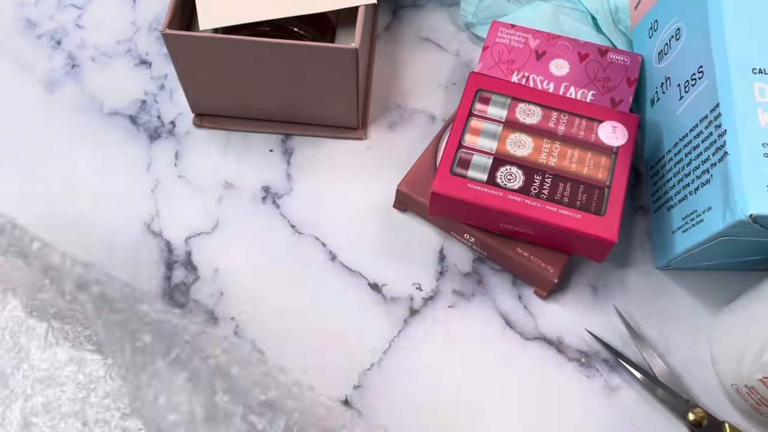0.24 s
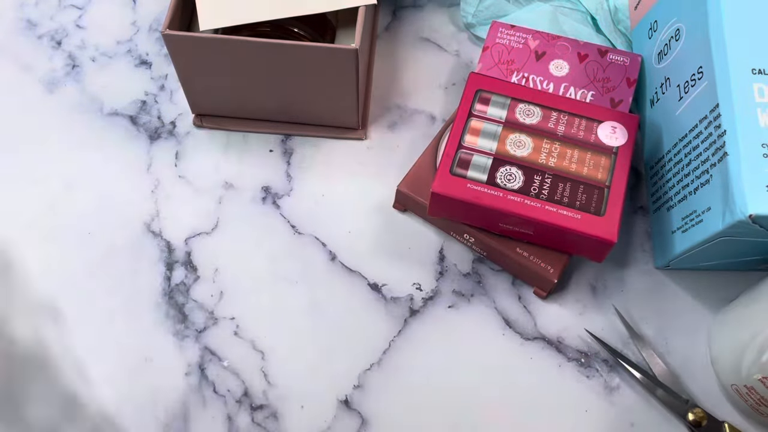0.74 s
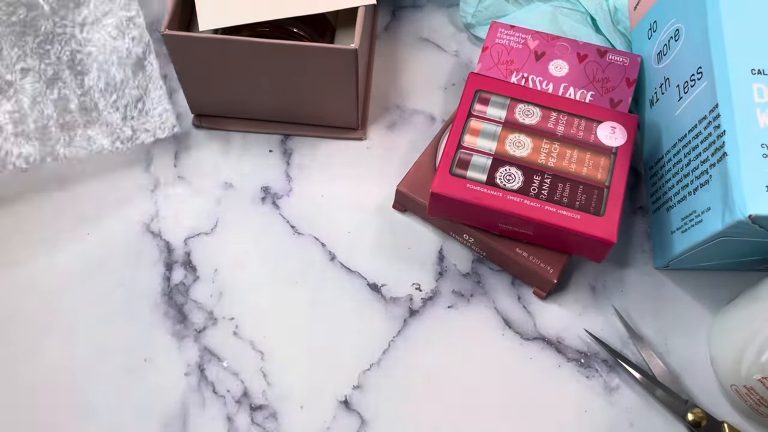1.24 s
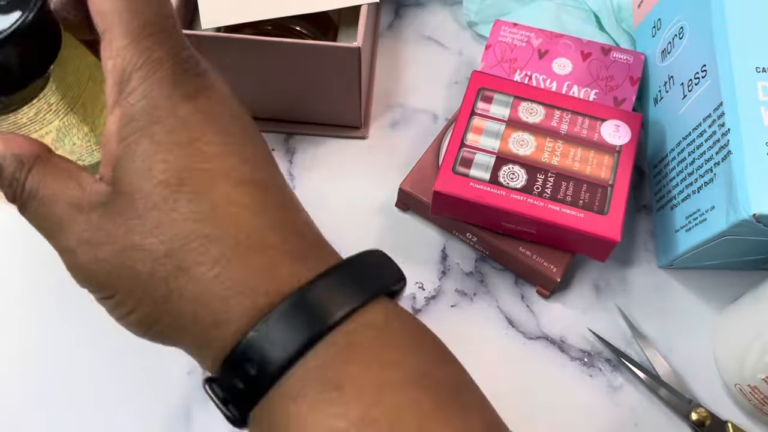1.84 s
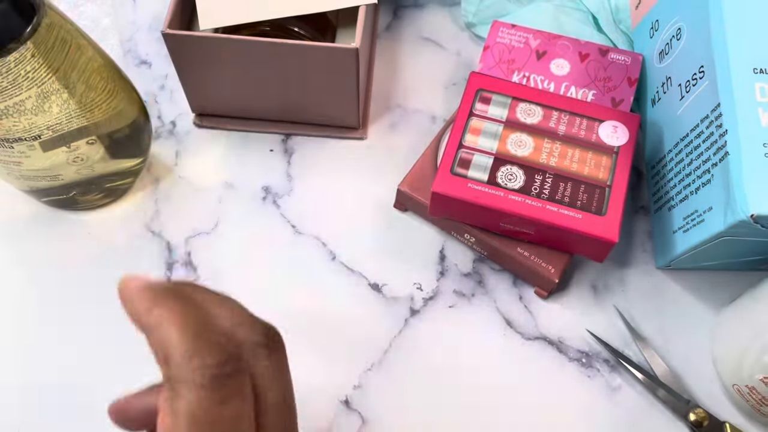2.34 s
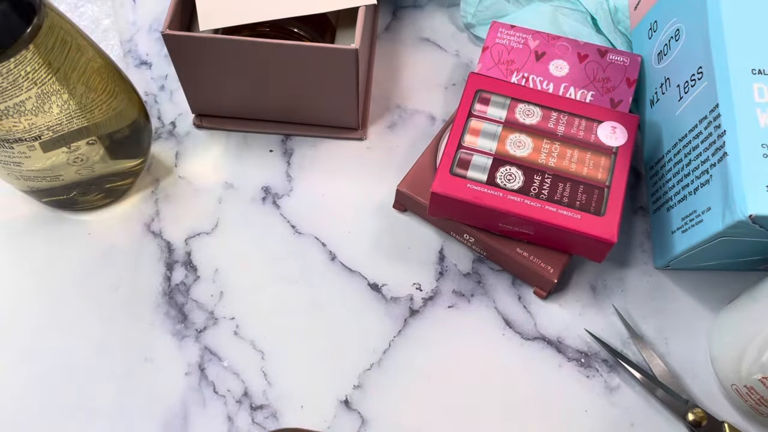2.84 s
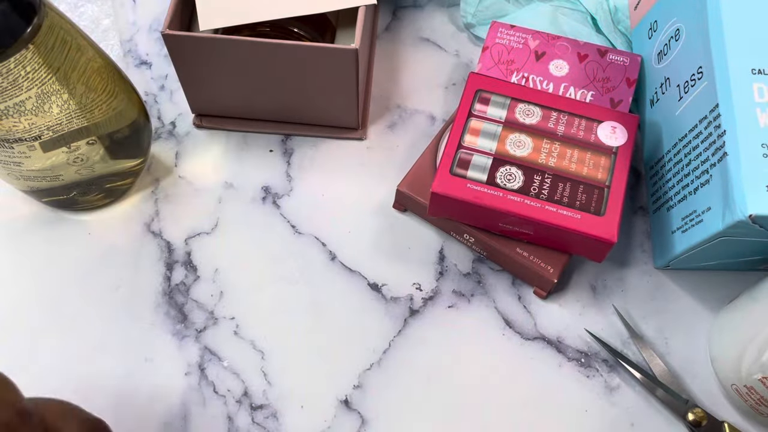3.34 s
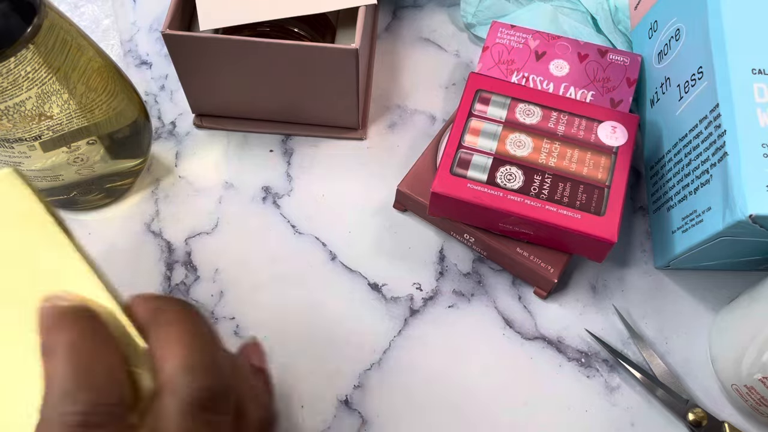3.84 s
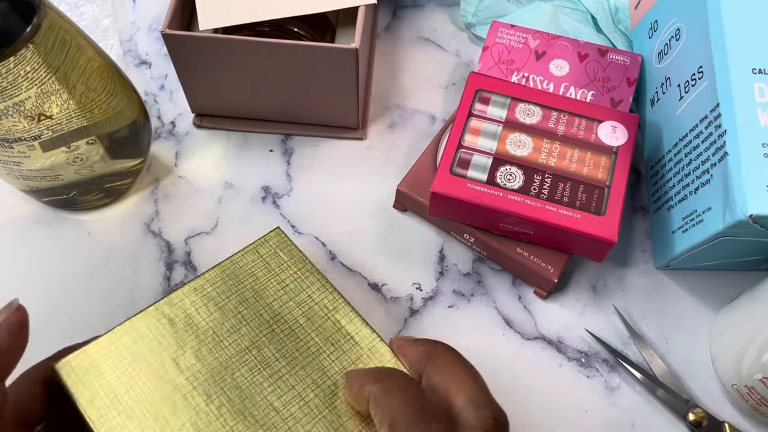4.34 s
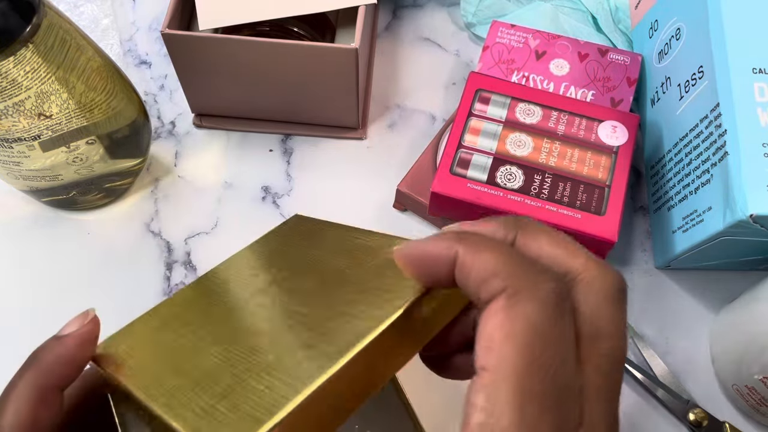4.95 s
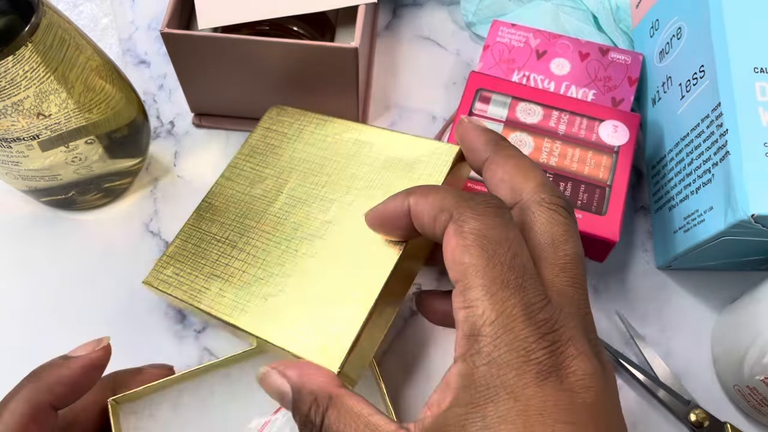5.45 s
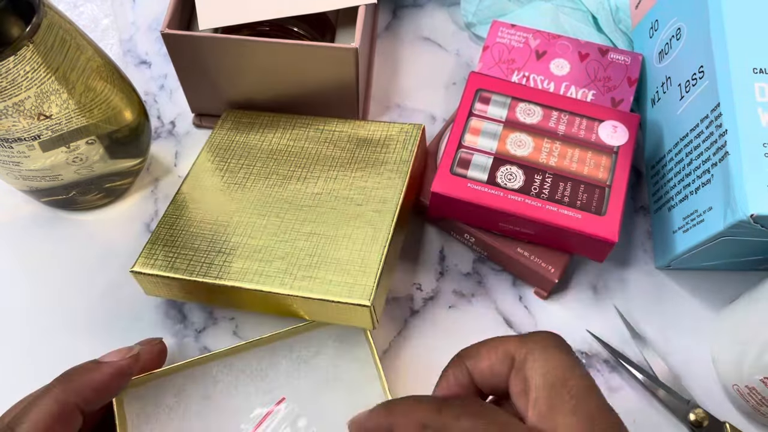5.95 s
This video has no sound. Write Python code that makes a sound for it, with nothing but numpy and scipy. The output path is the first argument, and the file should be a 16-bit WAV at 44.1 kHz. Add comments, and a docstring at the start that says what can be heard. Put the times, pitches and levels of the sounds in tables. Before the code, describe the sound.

Close on a stone countertop in a small quiet room, bubble wrap is yanked aside with a crackling burst and fading crinkles. A full glass bottle lands with a deep, hard thud and rocks softly. After a near-silent pause, a small cardboard box is slid in, tapped and rubbed; its lid squeaks free, knocks and clatters onto the stone, followed by faint rustles. Low building rumble stays underneath.

```python
"""Bubble wrap is pulled aside close by on a stone countertop: hissing noise plus many short noise snaps.
A full glass bottle is set down and rocks: ticks over thuds that ring the bending modes of the stone.
Hands slide in a cardboard box, tap it and lift its lid: grains and pushes through card resonances.
The lid squeaks in slip cycles and clatters onto the stone. Near sounds echo; filtered noise rumbles below.
"""
import sys
import numpy as np
from scipy import signal
from scipy.fft import rfft, irfft, next_fast_len
from scipy.io import wavfile
from scipy.ndimage import uniform_filter1d, map_coordinates

SR = 44100
rng = np.random.default_rng(int(sys.argv[2]) if len(sys.argv) > 2 else 0)


def store_pcm(level_fs):
    """Save levels as 16-bit WAV."""
    pcm = np.round(np.clip(level_fs, -1, 1) * 32767).astype(np.int16)
    wavfile.write(sys.argv[1], SR, np.atleast_2d(pcm).T)


N = 272758


def amp(db):
    """dB to gain."""
    return 10 ** (np.asarray(db) / 20)


def unit(x):
    """Scale to rms 1."""
    return x / np.sqrt(np.mean(x ** 2) + 1e-20)


def along(points, hz):
    """Read a curve of (f/Hz, value) points on a log frequency axis."""
    f, value = np.transpose(points)
    return np.interp(np.log(hz + 1), np.log(f + 1), value)


def curves(rows):
    """One value per sample for each column after the time."""
    s, *columns = np.transpose(rows)
    return [np.interp(np.arange(N) / SR, s, column) for column in columns]


def wobble(rate, size=N):
    """A smooth random curve, rate knots a second."""
    knots = rng.standard_normal(int(size * rate / SR) + 4)
    return map_coordinates(knots, [np.arange(size) * rate / SR])


def filtered(x, response):
    """Shape x by a complex response of frequency."""
    m = next_fast_len(x.shape[-1] + 8192)
    spectrum = rfft(x, m) * response(np.fft.rfftfreq(m, 1 / SR))
    return irfft(spectrum, m)[..., :x.shape[-1]]


def resonances(modes, scatter_db=0):
    """Causal sum of (f/Hz, width/Hz, level/dB) resonances with alternating signs."""
    gains = amp(scatter_db * rng.standard_normal(len(modes)))

    def response(f):
        total = 0
        for k, (centre, width, db) in enumerate(modes):
            band = 1j * f * width / (centre * centre - f * f + 1j * f * width)
            total = total + (-1) ** k * gains[k] * amp(db) * band
        return total

    return response


# left-right likeness of sound from all around: (f/Hz, likeness)
LIKENESS = [(60, 0.98), (300, 0.67), (700, 0.18), (1500, 0.023), (3000, 0.57), (6500, 0.28), (8000, 1),
            (16000, 0.94)]


def scattered(pair, colour):
    """Colour two unrelated signals and mix them to the left-right likeness of sound from all around."""
    turn = lambda hz: np.arccos(np.clip(along(LIKENESS, hz), -1, 1)) / 2
    shares = lambda hz: amp(along(colour, hz)) * [np.cos(turn(hz)), np.sin(turn(hz))]
    mid, side = filtered(pair, shares)
    return unit(np.array([mid + side, mid - side]))


def add(track, s, sound):
    """Mix a sound in at time s."""
    part = track[round(s * SR):][:len(sound)]
    part += sound[:len(part)]


SWING_DB, SAG_DB_PER_S = 23, 11  # level change over a rise or a fade; slackening while a move holds


def strokes(rows):
    """Rise, hold and fade of every move, summed in power; the brightness is the power-weighted mean of all
    moves' tilts."""
    t, power, colour = np.arange(0, N + 16, 16) / SR, 1e-11, 0
    for s, rise, hold, fade, db, tilt_db in rows:
        u = t - s
        held = np.clip(u, 0, hold)
        swings = np.maximum(-u, 0) / rise + np.maximum(u - held, 0) / fade
        part = amp(db - SWING_DB * swings - SAG_DB_PER_S * held) ** 2
        power, colour = power + part, colour + part * tilt_db
    return [np.interp(np.arange(N) / SR, t, c) for c in (np.sqrt(power), colour / power)]


SNAP_WIDTH = 0.65  # width of a snap's band over its centre


def snap(rows):
    """Each snap is a burst of noise around its own pitch, with some body below and air above."""
    out, t = np.zeros(N), np.arange(SR // 20) / SR
    for s, db, hz, t60, body_db, air_db in rows:
        envelope = amp(-60 * t / t60) * (1 - np.exp(-t / 0.00025))
        bands = [(1100, 1600, body_db), (hz, SNAP_WIDTH * hz, 0), (10000, 7000, air_db)]
        burst = filtered(rng.standard_normal(len(t)) * envelope, resonances(bands))
        add(out, s, amp(db) * burst / np.linalg.norm(burst))
    return out


# swell of the room rumble before its random waver: (t/s, level/dB)
RUMBLE_SWELL = [(0, -46), (1.1, -46), (1.83, -43.5), (2.44, -46), (2.83, -43), (3, -47), (4.01, -44.5),
                (4.5, -47.5), (6.18, -45.5)]
# relative spectrum of the rumble: (f/Hz, level/dB)
RUMBLE_SPECTRUM = [(20, -49), (36, -21.5), (50, 0.5), (62, 0.5), (86, -10), (118, -2.5), (142, -15.5),
                   (168, -7), (212, -18), (340, -27), (540, -36.5), (2500, -53.5), (5000, -91)]


def rumble():
    """Low noise of the building, slowly swelling."""
    level_db, = curves(RUMBLE_SWELL)
    noise = scattered(rng.standard_normal((2, N)), RUMBLE_SPECTRUM)
    return amp(level_db + 1.9 * wobble(6.8)) * noise


# moves of wrap, sleeves and skin, level before the brightness tilt:
# (t/s at full strength, rise/s, hold/s, fade/s, level/dB, brightness/dB: lows take -2 times it, highs 1.7)
RUSTLE_MOVES = [(0.0, .01, 0, 0.69, -45.5, 2), (0.41, 0.049, 0, 0.057, -27.5, 1),
                (0.44, 0.083, 0.03, 0.15, -40, 1.5), (0.6, 0.15, 0.38, 0.19, -48, 0),
                (1.094, 0.012, 0.32, 0.078, -50.5, 1), (1.45, 0.076, 0.17, 0.13, -59.5, -3),
                (1.62, 0.025, 0.057, 0.066, -56.5, -4), (1.712, 0.061, 0.31, 0.19, -50.5, 2),
                (2.219, 0.19, 0.3, 0.21, -59, 0), (2.921, 0.75, 0, 0.43, -64.5, -0.5),
                (3.334, 0.03, 0.036, .13, -67.5, -1), (3.494, 0.048, 0, 0.15, -72, -9),
                (3.656, 0.12, 0.0087, 0.18, -60.5, -0.5), (3.75, 0.314, 0.44, .3, -67, -2.5),
                (3.863, 0.063, 0.03, 0.015, -55, 2.5), (3.997, 0.078, 0.022, 0.11, -50.5, -2.5),
                (4.182, 0.21, 0, 0.13, -58, -1), (4.312, 0.12, 0, 0.14, -50.5, 0.5),
                (4.42, 0.099, 0.19, 0.22, -62, 0), (4.75, 0.13, 0.048, 0.092, -48.5, -0.5),
                (4.88, 0.14, 0, 0.78, -59.5, -0.5), (5.146, .025, .21, .05, -60, -1.5),
                (5.372, 0.049, 0.043, 0.081, -49, -1), (5.5, 0.045, 0.062, 0.051, -59.5, -3),
                (5.669, 0.073, 0.0065, 0.046, -42, -7), (5.76, .05, 0.066, 0.045, -72, -8.5),
                (5.888, 0.026, 0, 0.23, -59.5, 3), (6.07, 0.17, 0.072, 0.18, -57, 3)]
# relative spectrum of the film before the tilt: (f/Hz, level/dB)
FILM_SPECTRUM = [(150, -29.5), (500, 0), (1000, -4), (2500, -4), (5000, -3.5), (7500, -6.5), (10000, -8),
                 (13000, -13), (16000, -15.5)]
CRACKLE_SHARE = 0.28  # power share in the rustle's swell, before squaring up with its waver, 0-1


def rustle():
    """A soft hiss of sliding film with clumps of tiny crackles, each a short puff of noise."""
    level, tilt_db = strokes(RUSTLE_MOVES)
    chance = 350 * amp(6.6 * wobble(12)) / SR  # of a crackle at each sample
    sparks = (rng.random(N) < chance) * amp(4.1 * rng.standard_normal(N))
    puffs = signal.lfilter([1], [1, -amp(-60 / SR / 0.015)], sparks)  # t60 15 ms
    steady = np.sqrt(1 - CRACKLE_SHARE) * amp(1.6 * wobble(30))
    swell = steady + np.sqrt(CRACKLE_SHARE) * unit(puffs)
    z = signal.stft(swell * rng.standard_normal((2, N)), nperseg=256)[2]
    # each fold has its own colour
    folds = uniform_filter1d(rng.standard_normal(z.shape[1:]), size=8, axis=0)
    folds = uniform_filter1d(folds, size=3, axis=1)
    film = signal.istft(z * amp(1.4 * unit(folds)), nperseg=256)[1][:, :N]
    film = scattered(film, FILM_SPECTRUM)
    low = filtered(film, lambda hz: 1 / (1 + (hz / 1600) ** 4))
    high = filtered(film, lambda hz: 1 / (1 + (7000 / (hz + 1)) ** 4))
    return level * (film - low - high + amp(-2 * tilt_db) * low + amp(1.7 * tilt_db) * high)


# snaps of the wrap: (t/s, energy level/dB, centre f/Hz)
WRAP_SNAPS = [(0.0148, -21.5, 3435), (0.028, -32, 3210), (0.042, -27.5, 3326), (0.055, -25, 4380),
              (0.093, -20.5, 5150), (0.1222, -11.5, 6610), (0.144, -32, 5000), (0.153, -28, 6620),
              (0.175, -26, 4500), (0.188, -29, 3300), (0.2078, -26, 5060), (0.211, -27, 5500),
              (0.247, -24.5, 3120), (0.276, -29, 5040), (0.2873, -26, 5010), (0.311, -30, 5510),
              (0.361, -20, 6000), (0.377, -17.5, 4270), (0.376, -18.5, 900), (0.3948, -6, 801),
              (0.3944, -2.5, 4270), (0.405, 1, 4390), (0.4059, -3, 782), (0.4089, 0, 5554),
              (0.416, 2.5, 4200), (0.4171, 1, 705), (0.407, -8, 420), (0.4178, -3, 400), (0.446, -20, 5500),
              (0.483, -21.5, 3500), (0.537, -21.5, 4500), (0.54, -22, 794), (0.586, -26.5, 1010),
              (0.631, -20.5, 670), (0.639, -24, 2520), (0.689, -25, 5130), (0.765, -24.5, 4500),
              (0.785, -28.5, 1600), (0.841, -29, 5000), (0.879, -29, 5500), (0.948, -29, 2500),
              (1.021, -32, 5000), (0.969, -27, 1506), (1.089, -20.5, 4930), (1.198, -28, 640),
              (1.205, -29, 3500), (1.226, -31, 2000), (1.345, -29, 4500), (1.273, -33, 1810),
              (1.34, -25, 782), (1.4207, -29.5, 6360), (1.512, -32.5, 5950)]
WRAP_T60_S, WRAP_BODY_DB, WRAP_AIR_DB = 0.007, -12, -12.5  # body and air against the centre


def wrap_snaps():
    """The wrap's snaps share one short life and one balance of body and air."""
    return snap([(*row, WRAP_T60_S, WRAP_BODY_DB, WRAP_AIR_DB) for row in WRAP_SNAPS])


# blows into the countertop, nominal level: (t/s, level/dB, favoured f/Hz, fall-off/dB per octave)
BLOWS = [(.374, -30, 130, 10), (0.389, -19, 80, 22), (.43, -29, 75, 25), (1.618, -6.5, 196.6, 2),
         (1.708, -18, 187, 7.5), (1.749, -20, 144, 13), (1.77, -24.5, 167, 16), (1.783, -29.5, 152, 13),
         (1.925, -34, 139, 9), (2.801, -26.5, 257, 10), (4.008, -27.5, 206, 12.5), (5.369, -38.5, 258, 10),
         (5.569, -17.5, 252, 40), (5.624, -26, 260, 21)]
# bending modes of the countertop: (f/Hz, level/dB, t60/s, arrival/s after the blow)
COUNTER_MODES = [(80, -1, 0.09, 0.0145), (106.6, 1, 0.15, .0068), (111.4, -21, 1.2, .0135),
                 (163, -22.5, 0.91, .006), (168, -8.5, 0.064, 0.0064), (200, -3, 0.04, .0027),
                 (207.7, 1, 0.075, 0.0075), (247, -12, 0.09, 0.0075), (247, -33.5, 0.59, .006),
                 (373, -45, .9, .003), (411.6, -21.5, 0.15, 0.0028), (417, -40.5, .7, .003),
                 (450, -6, 0.034, 0.0012), (508, -22.5, 0.15, 0.00075), (640, -21, .1, 0.0023),
                 (690, -10.5, 0.02, 0.00013), (806, -27, 0.09, .002), (900, -5, .012, 0.00032),
                 (930, -29.5, 0.099, .002), (1140, -29.5, .07, .002), (1150, -13, 0.006, .0001),
                 (1316, -35, 0.079, 0.0011)]


def thuds():
    """Blows ring the countertop near their favoured pitch; slow bending waves bring low modes late."""
    out, t = np.zeros(N), np.arange(SR * 3 // 4) / SR
    for s, db, centre_hz, focus_db in BLOWS:
        for hz, level_db, t60, late in COUNTER_MODES:
            u = np.maximum(t[:round((t60 + late) * SR)] - late, 0)
            size_db = db + level_db - abs(focus_db * np.log2(hz / centre_hz)) + rng.normal(0, 1.2)
            # the late ring beats unevenly
            depth_db = (2.5 + hz / 150) * np.clip(u / .1, 0, 1)
            waver_db = depth_db * wobble(10 + hz / 20, size=len(u))
            onset = 1 - np.exp(-u * hz / 0.4)
            add(out, s, amp(size_db + waver_db - 60 * u / t60) * np.sin(2 * np.pi * hz * u) * onset)
    return out


# narrow rubs of film on stone and skin on glossy card, from hollow hums to whistles, nominal level:
# (t/s at full strength, rise/s, hold/s, fade/s, level/dB, centre f/Hz, width/Hz of each of two passes)
RUB_MOVES = [(.44, .02, .07, .04, -46, 190, 25), (3.645, .03, .03, .015, -47, 490, 130),
             (3.845, .015, .018, .02, -45, 500, 110), (3.66, .03, .01, .015, -52, 1250, 200),
             (3.865, .02, .012, .015, -52, 1300, 200), (3.653, .02, .018, .015, -60, 2400, 120),
             (3.867, .015, .008, .02, -53, 2440, 150), (3.868, .03, 0.0066, 0.018, -55, 4320, 500),
             (4.3, .03, 0.032, .03, -63.5, 2950, 300), (4.739, .04, 0.046, .04, -57, 2670, 250),
             (4.73, .04, .05, .04, -61, 3210, 200), (5.874, 0.0038, 0.065, 0.15, -62.5, 3190, 450),
             (5.882, .01, .04, .05, -71, 1800, 200), (5.963, 0.0065, 0.0067, 0.023, -49.5, 930, 40),
             (5.966, .008, 0.0087, 0.022, -59, 1930, 80), (6.059, .01, .01, .02, -64, 2400, 700),
             (6.07, .01, 0.01, .015, -59, 1350, 400), (6.123, .01, .006, .01, -65, 1850, 150)]


def rubs():
    """Every rub is noise passed twice through one narrow resonance."""
    out, u = np.zeros(N), np.arange(SR // 4) / SR - .06
    for s, rise, hold, fade, db, hz, width_hz in RUB_MOVES:
        drop_db = SWING_DB * (np.maximum(-u, 0) / rise + np.maximum(u - hold, 0) / fade)
        band = resonances([(hz, width_hz, 0)])
        tone = unit(filtered(rng.standard_normal(len(u)), lambda f: band(f) ** 2))
        add(out, s + u[0], amp(db - drop_db) * tone)
    return out


# hard little ticks of glass, nails and card edges: (t/s, energy level/dB, centre f/Hz, t60/s, body level/dB)
HARD_TICKS = [(1.6157, -14, 3870, 0.015, -6), (1.6368, -26.5, 4190, 0.006, -13),
              (1.707, -23, 3610, 0.0046, -44), (2.803, -33, 4010, 0.077, -2),
              (3.706, -30.5, 5530, 0.015, -8), (3.722, -39, 4600, 0.0075, -20),
              (3.775, -41.5, 3000, .008, -13), (3.872, -26.5, 4300, 0.02, -13.5),
              (3.9803, -11, 4300, 0.0076, -20), (3.603, -39, 3500, 0.0093, -8),
              (4.399, -28, 4000, 0.011, -4.5), (4.477, -31, 3320, .0064, -17),
              (5.1411, -30.5, 2505, .018, -7), (4.004, -22, 3300, .008, -8),
              (4.0145, -24.5, 3520, .008, -9), (4.172, -35, 3000, .01, -9), (4.257, -36, 3000, .008, -7),
              (4.089, -34, 3000, 0.0088, -7), (5.5684, -6.5, 3460, 0.0055, -13.5),
              (5.6232, -15.5, 3455, .005, -12), (5.661, -18, 3295, .006, -11.5),
              (5.6493, -14.5, 2596, 0.014, -16), (5.875, -40, 3150, .007, 4),
              (6.0713, -25.5, 3050, 0.012, -13), (6.087, -34, 4800, .008, -12),
              (6.1065, -29.5, 2440, 0.0097, -20), (6.135, -40, 4500, .006, -15),
              (6.148, -31.5, 5000, 0.0075, -20), (6.149, -31, 2350, .008, -20),
              (6.168, -27.5, 5680, 0.0086, -7.5)]
TICK_AIR_DB = -22  # against the centre


def ticks():
    """Hard contacts make short noise bursts, each with its own life and body."""
    return snap([(*row, TICK_AIR_DB) for row in HARD_TICKS])


# knocks on the cardboard: (t/s, peak level/dB, favoured f/Hz, fall-off/dB per octave)
CARD_KNOCKS = [(3.479, -45, 1300, 3.5), (3.605, -45.5, 726, 15), (3.9805, -13, 900, 3.5),
               (3.985, -27, 640, 20), (3.991, -33, 1530, 23), (4.037, -42, 1500, 17), (4.013, -38, 738, -3),
               (4.094, -39, 587, 26), (4.267, -35, 783, 18), (4.344, -42.5, 765, 37),
               (4.61, -21.5, 990, 7.5), (4.601, -41, 900, 4), (4.767, -34, 845, 18), (4.892, -47, 836, 4),
               (4.979, -40.5, 950, 4), (5.3653, -21.5, 795, 13), (5.373, -22.5, 790, 25),
               (5.3975, -19, 1300, 3), (5.5244, -17, 900, 0.5), (5.527, -19.5, 800, 8),
               (5.532, -28, 794, 21), (5.551, -22.5, 781, 1.5), (5.568, -21.5, 1604, 10),
               (5.581, -27, 1054, 2), (5.59, -26.5, 1510, 21), (5.607, -31, 1490, 34),
               (5.618, -27, 1480, 22), (5.623, -28, 1300, 16), (5.634, -25.5, 1510, 25),
               (5.6492, -17, 994, 0.5), (5.654, -21.5, 780, 15), (5.6614, -17, 1500, 2),
               (5.672, -27, 1040, 20), (5.688, -24, 1480, 17), (5.703, -29, 1520, 16), (5.716, -40, 900, 0),
               (5.948, -46, 1140, 20), (6.062, -45, 1000, 10), (6.028, -42.5, 765, 3)]
# resonances of the cardboard box, for knocks and slides: (f/Hz, width/Hz, level/dB)
BOX_MODES = [(382, 210, -12.5), (510, 96, -8), (640, 51, -2.5), (766, 79, 2), (996, 184, 3),
             (1042, 75, 5.5), (1300, 110, -3.5), (1520, 76, -0.5), (2022, 52, -11), (2484, 120, -5),
             (3070, 1800, -11.5), (4010, 1200, -9), (5150, 630, -14)]
# resonances of the lid, which rings clearer once it is off the box: (f/Hz, width/Hz, level/dB)
LID_MODES = [(344, 120, -12.5), (516, 64, -11.5), (640, 51, -5), (780, 48, 1), (930, 90, -5.5),
             (1040, 50, 1.5), (1232, 81, -5), (1344, 60, -5), (1490, 57, 0.5), (2065, 80, -7),
             (2550, 70, -6.5), (3000, 900, -15), (4000, 1200, -16.5), (5160, 550, -13.5)]
LIFT_S = 5.3  # from here the lid sounds instead of the box


def knocks():
    """A short soft push; the spot that is struck favours the resonances near its own pitch."""
    out, t = np.zeros(N), np.arange(SR // 10) / SR
    for s, db, centre_hz, focus_db in CARD_KNOCKS:
        push = amp(-60 * t / 0.0039) * (0.14 * rng.standard_normal(len(t)) + 4 * (t == 0))
        modes = [(hz, width, level_db - abs(focus_db * np.log2(hz / centre_hz)))
                 for hz, width, level_db in (BOX_MODES if s < LIFT_S else LID_MODES)]
        card = resonances(modes, scatter_db=2.5)
        # a yielding contact dulls the treble
        ring = filtered(push, lambda hz: card(hz) / (1 + 1j * hz / 2600) ** 2)
        add(out, s, amp(db) * ring / np.abs(ring).max())
    return out


# strokes of box and lid sliding, level before the brightness tilt:
# (t/s at full strength, rise/s, hold/s, fade/s, level/dB, brightness/dB: highs gain it, lows lose it)
SLIDE_STROKES = [(3.655, 0.06, 0.01, 0.021, -46, -6), (3.7, .15, .12, 0.16, -70, -5),
                 (3.85, 0.032, 0.0092, 0.059, -46, -6), (3.94, 0.1, 0.029, .02, -53.5, -5.5),
                 (3.983, 0.0059, 0, 0.064, -39, -18), (4.103, 0.14, 0, 0.057, -50, -5),
                 (4.186, 0.13, 0, 0.046, -51, -10), (4.272, 0.012, 0.011, 0.021, -41.5, -8.5),
                 (4.466, 0.26, 0, 0.089, -48.5, -6), (4.614, 0.2, 0.0052, 0.15, -45.5, -6),
                 (4.7, 0.086, 0.095, 0.036, -45, -1), (4.907, 0.059, 0, 0.1, -50, -5),
                 (5.553, 0.0042, 0.08, .03, -41.5, 0), (5.652, 0.004, 0.054, 0.023, -33.5, -4.5),
                 (6.068, 0.092, 0.0015, 0.04, -65, 7), (6.184, 0.071, 0.021, .05, -60, 5)]


def slide():
    """Fibres catch in quick irregular grains that sound through the cardboard."""
    first = round(SLIDE_STROKES[0][0] * SR) - SR // 4
    level, tilt_db = np.array(strokes(SLIDE_STROKES))[:, first:]
    span = N - first
    uneven_db = 2.8 * wobble(400, size=span) + 1.2 * wobble(60, size=span)
    grains = rng.standard_normal(span) * amp(uneven_db)
    box, lid = (unit(filtered(grains, lambda hz: resonances(modes)(hz) / (1 + 1j * hz / 2500)))
                for modes in (BOX_MODES, LID_MODES))
    z = signal.stft(np.where(np.arange(first, N) < LIFT_S * SR, box, lid), nperseg=512)[2]
    # a shifting grip damps now one resonance, now another
    grip = uniform_filter1d(rng.standard_normal(z.shape), size=3, axis=0)
    grip = uniform_filter1d(grip, size=6, axis=1)
    card = unit(signal.istft(z * amp(3.2 * unit(grip)), nperseg=512)[1][:span])
    low = filtered(card, lambda hz: 1 / (1 + (hz / 650) ** 4))
    return np.pad(level * (amp(tilt_db) * (card - low) + amp(-tilt_db) * low), (first, 0))


# the lid rim sticks and slips, nominal level and rate:
# (t/s, slip rate f/Hz, level/dB, roughness 0-1, level/dB added to the third harmonic and up)
RIM_SLIPS = [(5.366, 621, -28.5, 0.7, 6), (5.372, 631.7, -27.5, 0.7, -4), (5.379, 631.3, -25.5, 0.5, -3),
             (5.388, 634.6, -25, 0.4, -3), (5.398, 628.5, -23.5, 0.45, 0), (5.405, 612, -31.5, 0.45, -7),
             (5.414, 593, -26, 0.3, 1), (5.422, 593.7, -24, 0.28, 1), (5.44, 585.3, -25.5, 0.1, 1.5),
             (5.448, 603, -28.5, 0.25, 3), (5.456, 591, -32, .4, 0), (5.464, 564, -30, 0.6, -9),
             (5.474, 548, -40, 0.8, 0), (5.49, 560, -74, 0.8, -2)]
# relative spectrum of the rim: (f/Hz, level/dB)
RIM_SPECTRUM = [(300, -65), (600, -1.5), (1200, 1), (1800, -5), (2400, -5), (3000, -16.5), (3600, -16.5),
                (4200, -21), (5000, -24), (9000, -41), (16000, -67)]


def squeak():
    """Regular slips of the rim; a rough stretch shakes the overtones and fills in noise."""
    first, last = round(RIM_SLIPS[0][0] * SR), round(RIM_SLIPS[-1][0] * SR)
    hz, level_db, rough, upper_db = np.array(curves(RIM_SLIPS))[:, first:last]
    span = last - first
    jitter = .025 * rough * wobble(250, size=span)
    cycle = 2 * np.pi * np.cumsum(hz * (1 + jitter)) / SR
    slips = 0
    for k in range(1, 13):
        shake_db = (.4 + 2.5 * rough) * np.log2(k + .3) * wobble(120, size=span)
        harmonic_db = along(RIM_SPECTRUM, k * hz) + upper_db * (k > 2) + shake_db
        slips = slips + amp(harmonic_db) * np.sin(k * cycle + k * k)
    lid = resonances(LID_MODES)
    tilt_db = lambda f: 5.5 * np.log2(f / 1200 + .1)
    colour = lambda f: amp(along(RIM_SPECTRUM, f) + tilt_db(f)) * (0.39 + abs(lid(f)))
    hiss = unit(filtered(rng.standard_normal(span), colour))
    hiss = hiss * (1 + 0.29 * np.cos(cycle))  # pulses with the slips
    sound = amp(level_db) * (np.sqrt(1 - rough) * slips + 0.78 * np.sqrt(rough) * hiss)
    return np.pad(sound, (first, N - last))


# decay of the walls' answer: (f/Hz, t60/s)
WALL_DECAY = [(100, 0.24), (1000, 0.13), (10000, 0.031)]


def room(x):
    """Each frequency of the walls' answer dies at its own speed."""
    hz, t, z = signal.stft(rng.standard_normal((2, SR // 2)), SR, nperseg=256)
    decay = amp(-60 * t / along(WALL_DECAY, hz)[:, None])
    tail = signal.istft(z * decay, SR, nperseg=256)[1]
    tail = scattered(tail, [(100, -16), (400, -6), (16000, -2.0)])
    delayed = np.pad(x, (150, 0))[None]  # the walls answer 150 samples late
    return signal.fftconvolve(delayed, tail / np.linalg.norm(tail[0]), axes=1)[:, :N]


def scene():
    """Near sounds reach both ports alike; their echoes, the rumble and the rustle come from around."""
    near = wrap_snaps() + thuds() + rubs() + ticks() + knocks() + slide() + squeak()
    return near + amp(-11.0) * room(near) + rumble() + rustle()


# how much louder the left microphone port is: (f/Hz, level/dB)
LEFT_LEAN = [(60, 1.5), (300, 3), (900, 6.5), (2500, 5.5), (5000, 4.5), (7000, 0), (8000, 2), (16000, -0.5)]
# phase lead of the right microphone port: (f/Hz, lead/half cycles)
RIGHT_LEAD = [(100, 0), (3000, -.15), (6000, 0), (7800, 1), (8900, 1), (10300, 2), (12900, 2), (13700, 3),
              (20000, 3)]
TOP_HZ = 16400  # nothing passes from here up


def record(dry):
    """The left port faces the hands; the right turns in phase over the treble. Deep bass is cut."""
    def ports(hz):
        lean_db = along(LEFT_LEAN, hz) / 2
        return np.array([amp(lean_db), amp(-lean_db) * np.exp(1j * np.pi * along(RIGHT_LEAD, hz))])

    bass_cut = lambda hz: (1j * hz / 35 / (1 + 1j * hz / 35)) ** 2
    return filtered(dry, lambda hz: ports(hz) * bass_cut(hz) * (hz < TOP_HZ))


dry = scene()
out = record(dry)
store_pcm(out)
```